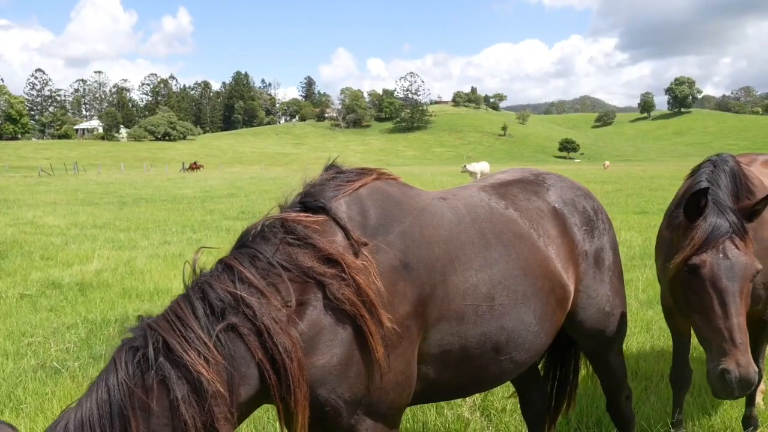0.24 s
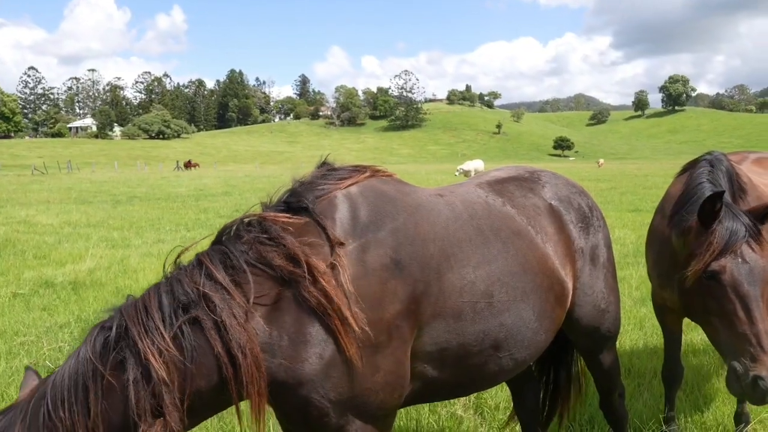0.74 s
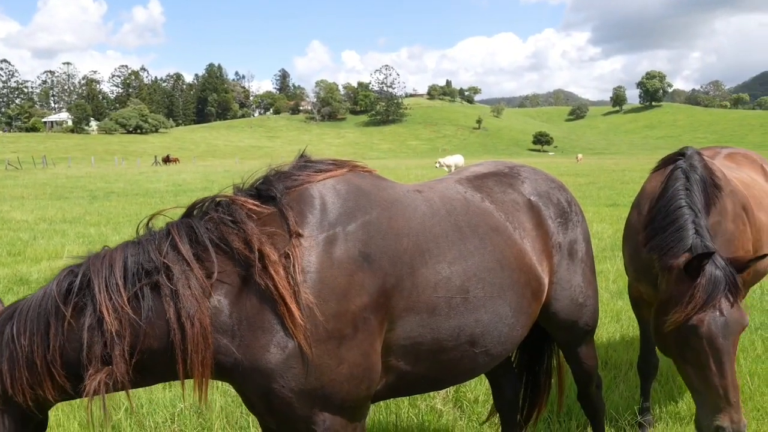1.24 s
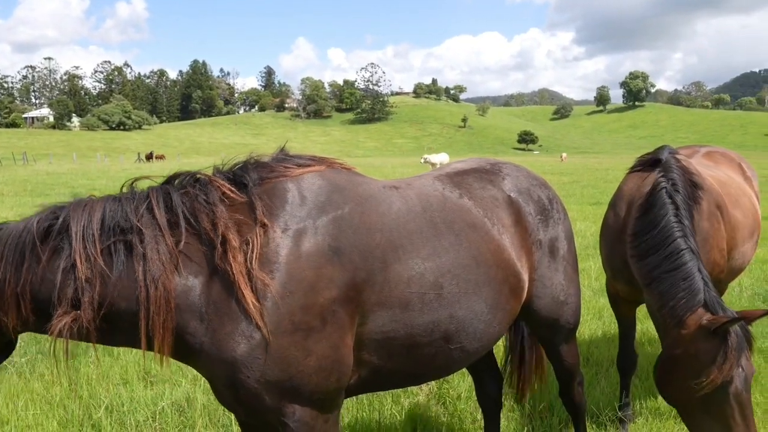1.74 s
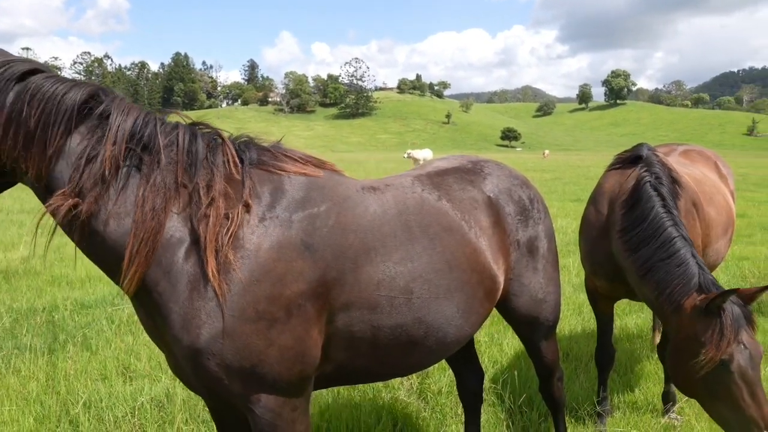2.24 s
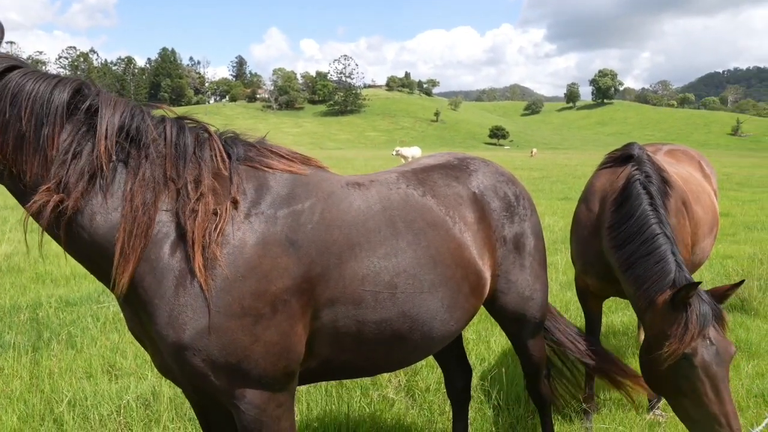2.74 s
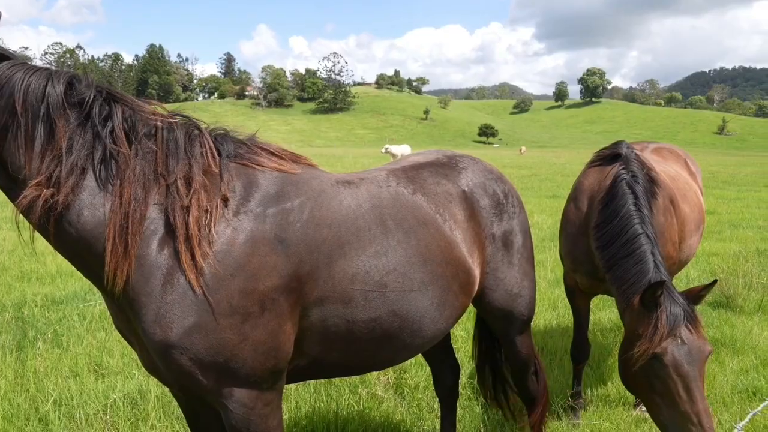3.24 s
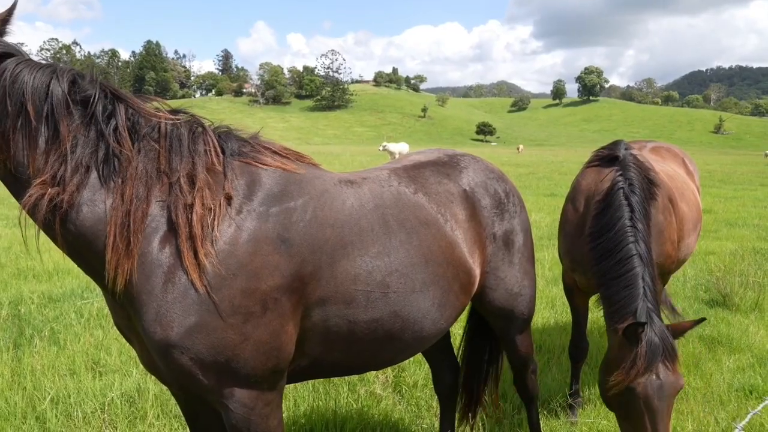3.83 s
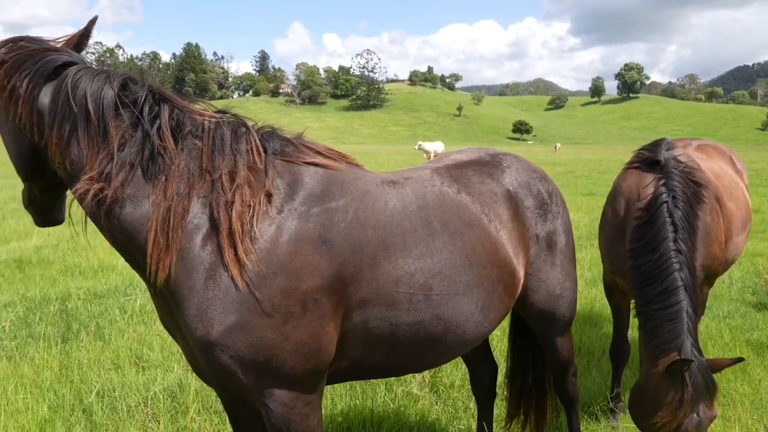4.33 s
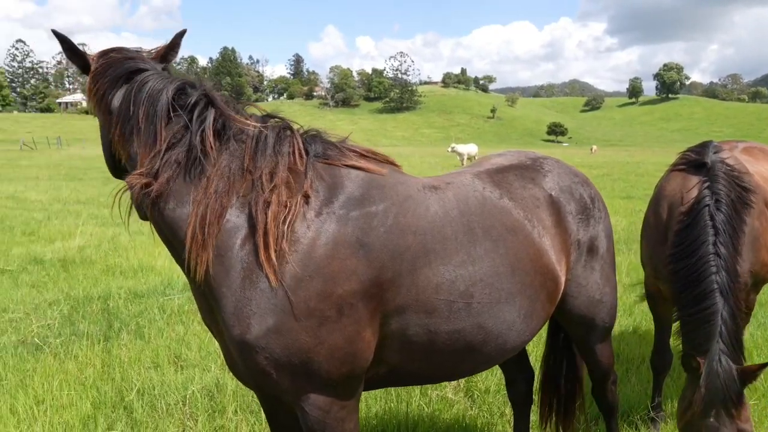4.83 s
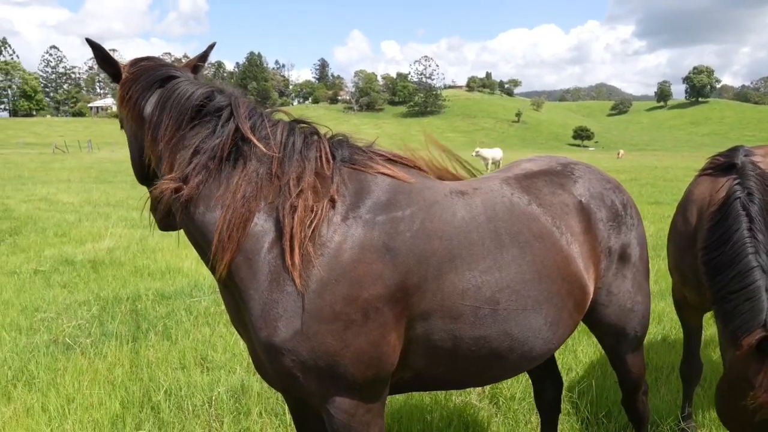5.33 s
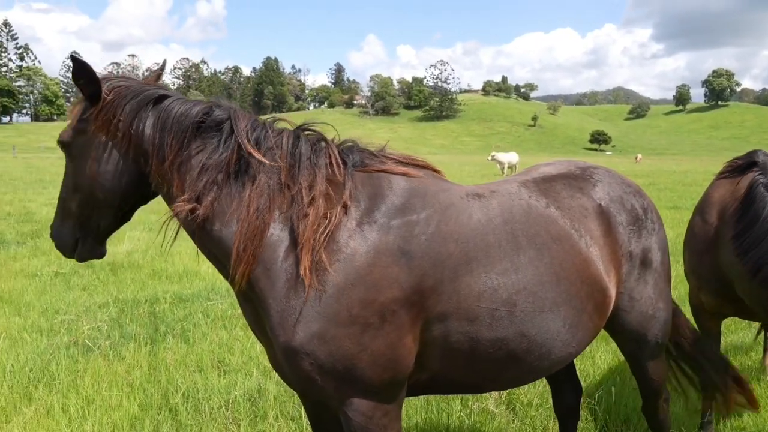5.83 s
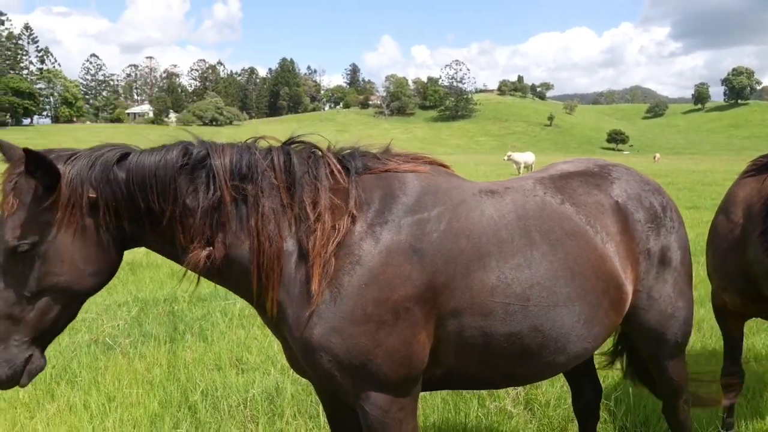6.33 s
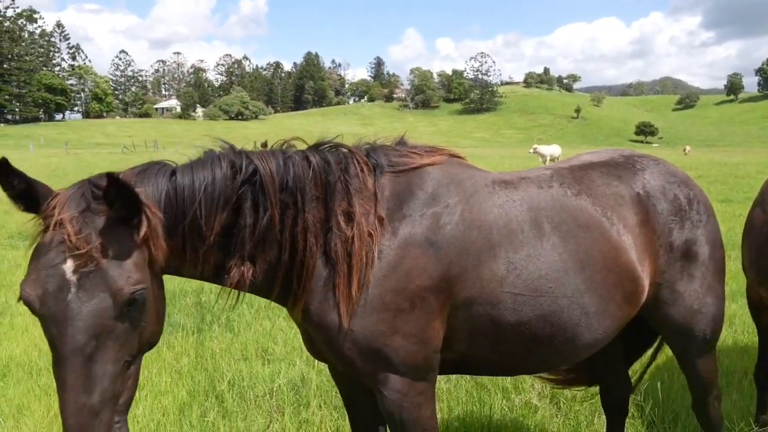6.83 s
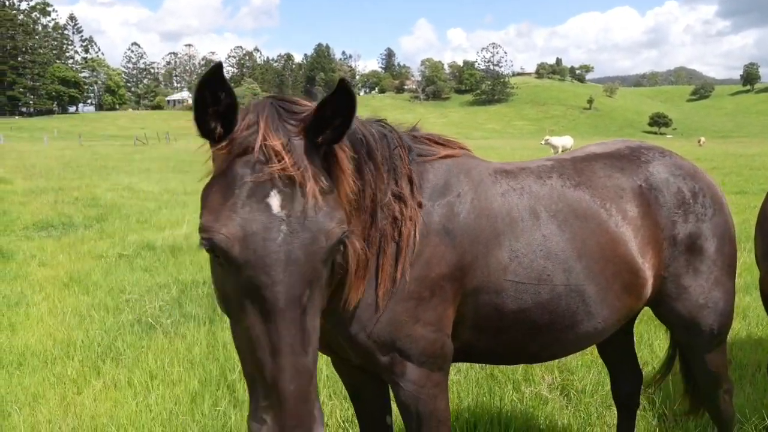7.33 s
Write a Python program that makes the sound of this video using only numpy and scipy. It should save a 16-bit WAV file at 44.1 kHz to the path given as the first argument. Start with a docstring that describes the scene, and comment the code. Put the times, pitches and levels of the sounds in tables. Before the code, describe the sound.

A horse in an open pasture gives five almost identical whinnies, starting near 0, 1.5, 3.0, 4.5 and 6.0 seconds, each lasting about 1.2 seconds. Each opens with a thin, high squeal; a lower, raspy voice joins and quavers about eight times a second, then cracks downward and fades in a hoarse, breathy flutter. The calls are central, with only a slight dull outdoor scatter. Beneath them are soft grass rustle, swelling around 1.8, and a very faint high insect trill. Wind is slight at first, then rumbles and thumps on the microphone from about 2.1, heaviest around 3.8-4.6, with smaller gusts later. Faint bright swishes pass near 1.5, 2.3, 5.2 and 5.7. Tiny metallic tinks chatter on the right around 1.4-1.7, 2.1-2.3 and 5.5-5.7. A soft woody knock at 7.5 precedes a very short, hard scrape at the end.

```python
"""Breezy pasture: one horse whinny sounds five times. It opens as a thin squeal; a second, lower voice
joins, quavers about eight times a second and sinks into a hoarse flutter. Two oscillators, torn overtones
and resonant noise make the call; each quaver is a push of the belly that bends pitch and swells the voice.
Shaped noise makes grass rustle, a faint insect trill, gusts on the microphone and light swishes;
decaying modes tinkle on the right, and filtered noise makes one soft knock and a last short scrape."""
import sys
import numpy as np
from scipy import signal
from scipy.fft import rfft, irfft, next_fast_len
from scipy.io import wavfile

SR = 44100
rng = np.random.default_rng(int(sys.argv[2]) if len(sys.argv) > 2 else 0)


def bounce(signal):
    """Save signal as a 16-bit WAV file at the path given by the first command-line argument."""
    frames = np.transpose(np.atleast_2d(signal))
    limited = np.clip(frames, -1, 1)
    pcm = np.round(limited * 32767).astype(np.int16)
    wavfile.write(sys.argv[1], SR, pcm)


N = 334219
T = np.arange(N) / SR
BREAK_S = .775  # the voice breaks, counted from the start of a whinny


def undb(db):
    """Decibels to gain."""
    return 10 ** (np.asarray(db) / 20)


def unit(x):
    """Scale to rms 1."""
    return x / np.sqrt(np.mean(x ** 2))


def curves(rows, t):
    """Each column of a table, joined by straight lines over its first column, time."""
    s, *columns = np.transpose(rows)
    return [np.interp(t, s, c) for c in columns]


def gain_at(points, hz):
    """Gain of a (Hz, dB) spectrum at any frequency, interpolated over log frequency."""
    f, db = np.transpose(points)
    return undb(np.interp(np.log(hz + 1), np.log(f), db))


def colour(x, gain):
    """Filter by gain(Hz) and scale to rms 1."""
    size = next_fast_len(len(x), True)
    spectrum = rfft(x, size) * gain(np.fft.rfftfreq(size, 1 / SR))
    return unit(irfft(spectrum, size)[:len(x)])


def noise(gain, count):
    """Noise of rms 1 whose spectrum follows gain(Hz)."""
    return colour(rng.standard_normal(count), gain)


def wobble(hz, count):
    """Random unsteadiness of rms 1, up to about hz times a second."""
    return noise(lambda f: 1 / (1 + (f / hz) ** 4), count)


def resonances(modes, hz):
    """Gain of a set of steep-sided resonances (Hz, width Hz, dB), summed in power."""
    return np.sqrt(sum(undb(db) ** 2 / (1 + (2 * (hz - f) / width) ** 6) for f, width, db in modes))


def dip(hz, centre_hz, half_width_hz, db):
    """Gain of an antiresonance; half its dB depth remains at the half width."""
    return undb(db / (1 + ((hz - centre_hz) / half_width_hz) ** 4))


def field():
    """Soft rustle of grass and far trees, wider in the treble, with a thin narrowband trill of insects."""
    # rustle spectrum: (frequency [Hz], relative level [dB])
    rustle_colour = [(180, -16), (300, -19.5), (359, -14.5), (498, -16.5), (587, -20.5), (991, -20.5),
                     (1350, -21.5), (1470, -21), (2280, -25.5), (2780, -33.5), (2920, -29), (11500, -41),
                     (15000, -52.5)]
    level_db, swell_db, swell_s, swell_length_s = -59, 4, 1.81, .73
    mid = noise(lambda f: gain_at(rustle_colour, f), N)
    side = noise(lambda f: gain_at(rustle_colour, f) * f / (f + 5000), N)
    sway_db = 1.2 * wobble(4, N)
    swell = swell_db * np.exp(-((T - swell_s) / swell_length_s) ** 2)
    rustle = undb(level_db + swell + sway_db) * (mid + undb(-4.5) * side * np.array([[1], [-1]]))

    insect_hz, insect_width_hz, insect_db = 8900, 320, -87
    insect_swell_db, insect_peak_s, insect_length_s = 8.5, 3, 2.8
    trill_db = insect_db + insect_swell_db * np.exp(-((T - insect_peak_s) / insect_length_s) ** 2)
    flicker_db = 4 * wobble(12, N)
    trill = noise(lambda f: resonances([(insect_hz, insect_width_hz, 0)], f), N)
    return rustle + undb(trill_db + flicker_db) * trill


def gusts():
    """Strength of the wind: each gust rises fast, holds and dies back into the breeze."""
    # gusts on the microphone: (hold start [s], hold [s], level [dB])
    gust_rows = [(.6, 0.027, -52), (2.122, 0.31, -45.5), (2.241, 0.033, -35), (2.518, 0.057, -32),
                 (2.62, 0.41, -41.5), (3.001, 0.5, -41), (3.782, 0.2, -33.5), (3.939, 0.24, -32),
                 (4.308, 0.12, -29.5), (4.57, 0.041, -37.5), (4.679, 0.13, -37), (5.094, 0.1, -44.5),
                 (5.271, 0.058, -31.5), (5.38, 0.35, -43.5), (5.89, 0.38, -38.5), (6.382, 0.31, -41.5),
                 (7.155, 0.026, -48), (7.526, 0.095, -42.5)]
    # breeze between gusts: (time [s], level [dB])
    breeze = [(0, -71.5), (1.7, -58.5), (4.2, -41.5), (5.8, -67), (7.5, -53.5)]
    attack_s, release_s = .022, .053
    strength = undb(curves(breeze, T)[0])
    for s, hold, db in gust_rows:
        away = np.maximum(s - T, 0) / attack_s + np.maximum(T - s - hold, 0) / release_s
        strength = np.maximum(strength, undb(db) * np.exp(-np.minimum(away, 20)))
    return strength


def wind():
    """Eddies rumble on the microphone; single buffets each swing the pressure once both ways."""
    # rumble spectrum: (frequency [Hz], relative level [dB])
    wind_colour = [(12, -80), (20, -4), (65, 5), (117, 5), (286, -10.5), (357, -21), (484, -26), (585, -28),
                   (743, -57), (900, -29), (1170, -85), (1980, -120)]
    # buffets: (time, 2 ms ahead of the centre [s], strength before the swing shape [dB],
    # centre to extreme [s])
    buffets = [(2.254, -26, 0.0015), (2.54, -16.5, 0.002), (2.809, -30, 0.0016), (2.873, -27, 0.0019),
               (2.998, -22, 0.0014), (3.026, -19.5, 0.0013), (3.069, -24.5, 0.0024), (3.173, -22, 0.0012),
               (3.352, -21.5, 0.0012), (3.85, -18, 0.0014), (3.941, -24, 0.0017), (3.965, -17, 0.0017),
               (4.032, -18, 0.0011), (4.057, -9.5, 0.0011), (4.163, -24, 0.001), (4.213, -20, .0011),
               (4.31, -27, 0.00076), (4.349, -16.5, 0.00092), (4.372, -18, 0.0021), (4.391, -19, 0.0021),
               (4.415, -21.5, 0.00084), (4.431, -27.5, 0.0006), (4.522, -26, 0.0016),
               (4.581, -16.5, 0.0014), (4.715, -29, 0.00073), (5.282, -23, 0.0016)]
    mid = noise(lambda f: gain_at(wind_colour, f), N)
    # small eddies hit each port on its own, large ones hit both
    side = noise(lambda f: gain_at(wind_colour, f) * f / (f + 300), N)
    strength = gusts() * unit(undb(2.2 * wobble(35, N)))
    out = strength * (mid + undb(-8.5) * side * np.array([[1], [-1]]))
    for s, db, half_s in buffets:
        u = (T - s - .002) / half_s
        near = np.abs(u) < 10
        out[:, near] += undb(db) * u[near] * np.exp(-u[near] ** 2 / 2)
    return signal.sosfilt(signal.butter(2, 46 / (SR / 2), "high", output="sos"), out)


def swishes():
    """Fine strands brush past each other: a bright, grainy hiss that swells and fades."""
    # swishes, likely a tail or long grass: (centre [s], half length [s], level [dB])
    strokes = [(1.497, 0.22, -78), (2.3, 0.17, -60), (5.197, 0.087, -69), (5.732, 0.055, -58.5)]
    # hiss spectrum: (frequency [Hz], relative level [dB])
    hiss_colour = [(2000, -23), (5000, 0), (9000, -8), (14000, 0), (16000, -14)]
    swell = sum(undb(db) * np.exp(-np.minimum(((T - s) / half) ** 2, 30)) for s, half, db in strokes)
    grain = unit(undb(2 * wobble(120, N)))
    hiss = np.array([noise(lambda f: gain_at(hiss_colour, f), N) for _ in range(2)])
    return swell * grain * hiss


def tinks():
    """A tiny piece of metal ticks and chatters in three high decaying modes, on the right."""
    # tinks, before envelope and panning: (start [s], low mode [dB], middle mode [dB], high mode [dB])
    tink_rows = [(1.379, -78, -64, -79), (1.4915, -76, -59, -66), (1.653, -62, -56, -71),
                 (2.136, -58, -50, -46), (2.255, -76, -63, -57), (2.296, -72, -54, -54),
                 (5.477, -72, -57, -52), (5.5654, -76, -58, -62), (5.66, -56, -51, -44)]
    mode_hz = (9650, 11680, 13450)
    tick_db, tick_t60_s = -18, .05  # contact noise, against the strongest mode
    attack_s, ring_t60_s = .004, .13
    out, t = np.zeros(N), T[:8000]
    count = len(t)
    ring = (1 - np.exp(-t / attack_s)) * undb(-60 * t / ring_t60_s)
    for s, *mode_db in tink_rows:
        modes = 0
        for hz, db in zip(mode_hz, mode_db):
            tone = np.sin(2 * np.pi * hz * t + .3 * wobble(120, count))
            modes = modes + undb(db) * tone * (1 + .35 * wobble(140, count))
        tick_fade = undb(max(mode_db) + tick_db - 60 * t / tick_t60_s)
        tick = tick_fade * noise(lambda f: resonances([(11994, 7500, 0)], f), count)
        i = int(s * SR)
        out[i:i + count] += ring * modes + tick
    return out * undb([[-5], [4]])  # left, right


def knock():
    """One dull, woody tap: decaying noise in two broad resonances."""
    start_s, level_db, attack_s, t60_s = 7.485, -44, .001, .09
    age = np.maximum(T - start_s, 0)
    fade = (1 - np.exp(-age / attack_s)) * undb(-60 * age / t60_s)
    body = noise(lambda f: resonances([(700, 1800, 5), (1800, 1300, -4)], f), N)
    return undb(level_db) * fade * body


def scrape():
    """Something hard catches and slips close by: two short jerks of resonant noise."""
    # jerks: (centre [s], half length [s], level [dB])
    jerks = [(7.5722, .0022, -29), (7.5777, .0015, -23)]
    # resonances: (frequency [Hz], width [Hz], relative level [dB])
    modes = [(705, 1150, -7), (2500, 400, -10), (4250, 360, -1), (4200, 3200, -12.5), (10000, 9300, -23)]
    swell = sum(undb(db) * np.exp(-np.minimum(((T - s) / half) ** 2, 30)) for s, half, db in jerks)
    return swell * noise(lambda f: resonances(modes, f), N)


def pushes(t):
    """Each push of the belly is a smooth hump that bends the low voice and swells chest tone and throat."""
    # one push per quaver: (peak [s], rise [s], fall [s], low voice bend [Hz], chest tone [dB], throat [dB])
    push_rows = [(.24, 0.042, .06, -150, -65, -42.5), (0.366, 0.026, .06, -115, -45, -43),
                 (.484, .04, .044, -118, -32, -34), (.603, 0.046, .042, -115, -29.5, -31.5),
                 (.728, 0.07, .042, -135, -28.5, -34.5), (.838, .055, .062, 122.5, -30, -32),
                 (.948, 0.046, .085, 180, -35, -40.5), (1.085, 0.048, .045, 91.5, -36, -61)]
    swell_shape = .44  # above 1: more pointed
    bend_shape = .8  # below 1: rounder
    push, bend, chest, throat = np.zeros((4, len(t)))
    for s, rise, fall, bend_hz, chest_db, throat_db in push_rows:
        phase = np.clip((t - s) / np.where(t < s, rise, fall), -1, 1)
        hump = np.maximum(np.cos(np.pi / 2 * phase), 0)
        swell = hump ** (2 * swell_shape)
        push += hump ** 2
        bend += bend_hz * hump ** (2 * bend_shape)
        chest += undb(chest_db) * swell
        throat += undb(throat_db) * swell
    return push, bend, chest, throat


def groan(t, hz, phase, puffs):
    """Slack folds: four harmonics slide through low resonances and grow dull, with a little puffing air."""
    # low resonances: (frequency [Hz], level [dB])
    groan_colour = [(120, -4), (180, 3.5), (230, -3.5), (310, -4.5), (390, 0), (480, 2.5), (530, -0.5),
                    (600, -12.5), (720, -27), (1000, -44)]
    # overtones fade as the breath runs out: (time [s], level per harmonic above the first [dB])
    dulling = [(1.11, 0), (1.17, -6)]
    count, dull_db = len(t), curves(dulling, t)[0]
    tone = 0
    for k in np.arange(1, 5):
        weight = gain_at(groan_colour, k * hz) / k ** .4
        level_db = (k - 1) * dull_db + 1.5 * wobble(70, count)
        tone = tone + weight * np.sin(k * phase + k * k) * undb(level_db)
    return tone + undb(-14) * puffs * noise(lambda f: gain_at(groan_colour, f), count)


def low_voice(t, hz, phase, puffs, air_db):
    """The chest tone, and its overtones mixed with air in the throat."""
    # throat and nose: (frequency [Hz], relative level [dB])
    throat_colour = [(550, -11), (700, 2), (790, -7), (940, 0), (1130, -4.5), (1350, 9), (1560, -6),
                     (1750, 4.5), (2000, -6.5), (2250, -4), (2500, -22.5), (3400, -51)]
    # overtones tear loose from the chest tone: (time [s], phase spread per harmonic number [rad])
    tearing = [(.3, .12), (.45, .14), (.76, .15), (.8, .09), (1.0, .09), (1.04, .2)]
    tear_hz, shimmer_db = 110, 3.6
    count = len(t)
    tear = curves(tearing, t)[0]
    overtones, power = 0, 0
    for k in np.arange(2, 13):
        weight = gain_at(throat_colour, k * hz)  # the overtone slides through the throat's resonances
        torn_phase = k * (phase + tear * wobble(tear_hz, count)) + k * k
        overtones = overtones + weight * np.sin(torn_phase) * undb(shimmer_db * wobble(56, count))
        power = power + weight ** 2
    overtones = unit(overtones / np.sqrt(power))
    air = puffs * noise(lambda f: gain_at(throat_colour, f), count)
    voice = (overtones + undb(air_db) * air) / np.sqrt(1 + undb(2 * air_db))
    # at the end the folds slacken: the tone turns into a groan
    slack = np.clip((t - 1.015) / .0097, 0, 1)
    tone = np.sqrt(2) * np.sin(phase) * undb(1.64 * wobble(81, count))
    return (1 - slack) * tone + slack * groan(t, hz, phase, puffs), voice


def linger(x):
    """Quick, dense reflections let each torn overtone ring on for a moment."""
    count, ring_db, t60_s = 4000, 0, .07
    tail = rng.standard_normal(count) * undb(-60 * T[:count] / t60_s)
    ringing = signal.fftconvolve(x, tail / np.linalg.norm(tail))[:len(x)]
    return unit(x + undb(ring_db) * ringing)


def rasp(t, high, low, puffs):
    """Torn overtones of both voices and rushing air ring the mouth, which takes three shapes in turn."""
    # mouth: (frequency [Hz], width [Hz], then relative level [dB] in squeal, quaver and after the break)
    mouth_modes = np.array([(2926, 424, 4, 4.5, 5), (3417, 330, 2.5, 3, 4.5), (3944, 400, -6, 2.5, 0.5),
                            (4250, 530, -1, -3, -11), (4680, 120, 2, -18, -8), (4934, 200, -1, -4, -2),
                            (5402, 730, -11.5, 1, -9), (6340, 1140, -12.5, -10.5, -7.5),
                            (6460, 340, -7, -19, -20), (7460, 740, -17.5, -12, -18.5),
                            (8480, 1070, -19, -16.5, -14), (9360, 580, -16, -18, -36),
                            (10050, 770, -19, -12.5, -8)])
    # the squeal's torn overtones: (time [s], level [dB])
    torn_level = [(.25, -4.5), (.5, -8.5), (.68, 0), (.8, -3)]
    # mouth antiresonances until the break: (frequency [Hz], half width [Hz], depth [dB])
    mouth_dips = [(2650, 180, -1), (4880, 86, -14), (5770, 190, -8)]
    buzz_db, rush_db = -1, -4
    glance_s, glance_gain = .0031, .17  # a close reflection ripples the treble
    quaver_s = .489  # the mouth takes its second shape
    count = len(t)
    torn = sum(np.sin(k * high) * undb(3 * wobble(150, count)) for k in (2, 3, 4))
    torn = unit(torn * (1 + .14 * np.cos(low) + .12 * np.cos(2 * low)))
    buzz = unit(sum(np.sin(k * low + k * k) * undb(4 * wobble(60, count)) for k in np.arange(5, 21)))
    rush = puffs * rng.standard_normal(count)
    source = undb(curves(torn_level, t)[0]) * torn + undb(buzz_db) * buzz + undb(rush_db) * rush
    source = linger(source + glance_gain * np.roll(source, int(glance_s * SR)))

    def shaped(column):
        return colour(source, lambda f: resonances(mouth_modes[:, [0, 1, column]], f))

    def hollows(f):
        return np.prod([dip(f, *row) for row in mouth_dips], axis=0)

    squealing = colour(shaped(2), lambda f: hollows(f) * dip(f, 2970, 100, -16))
    quavering = colour(shaped(3), hollows)
    broken = shaped(4)
    opened = np.clip((t - quaver_s) / .03, 0, 1)
    past = np.clip((t - BREAK_S) / .0072, 0, 1)
    return (1 - opened) * squealing + (opened - past) * quavering + past * broken


def rings(t, push):
    """Narrow resonances of the open mouth as noise bands; each push pulls them down, they drift and flare."""
    # open mouth: (frequency [Hz], half width [Hz], relative level [dB])
    ring_rows = [(3294, 52, -7), (3850, 150, -7.5), (4364, 66, -9), (4570, 64, -11.5), (5234, 115, -10.5),
                 (5500, 45, -17.5), (6390, 44, -13.5), (6780, 120, -12), (9420, 150, -20)]
    sag, wander = .025, .007  # shares of the frequency
    count, out = len(t), 0
    for hz, half_width_hz, db in ring_rows:
        turn = 2 * np.pi * hz * np.cumsum(1 - sag * push + wander * wobble(14, count)) / SR
        flare = unit(undb(2.5 * wobble(16, count)))
        band = wobble(half_width_hz, count) * np.sin(turn) + wobble(half_width_hz, count) * np.cos(turn)
        out = out + undb(db) * flare * band
    return out * np.interp(t, [.22, .5, .75, .8], [.59, .65, .69, .65])


def squeal_voice(t, high, low):
    """The high oscillator: a whistle, sidebands spaced by the low voice, and ragged overtones."""
    # overtones: (time [s], second harmonic against the squeal [dB], third against the squeal [dB])
    overtone_levels = [(.11, -24, -34), (.15, -15, -28), (.185, -22, -24), (.235, -15, -20),
                       (.265, -13, -5), (.305, -13, -24), (.39, -14, -12), (.45, -13, -18), (.8, -26, -26)]
    sideband_flicker_db, overtone_flicker_db, overtone_tear_rad = 3.5, 4, 1.1
    count = len(t)
    # the low voice hangs sidebands under the squeal until the voice breaks
    coupling = np.interp(t, [.3, .37, BREAK_S, .8], [0, 1, 1, 0])
    sidebands = 0
    for k, db in enumerate([-2, -7], 1):
        flicker = undb(sideband_flicker_db * wobble(42, count))
        sidebands = sidebands + undb(db) * np.sin(high - k * low) * flicker
    whistle = unit(np.sin(high) * undb(2.8 * wobble(170, count)))
    overtones = 0
    for k, db in enumerate(curves(overtone_levels, t), 2):
        ragged = np.sin(k * high + overtone_tear_rad * wobble(190, count))
        flicker = unit(undb(overtone_flicker_db * wobble(70, count)))
        overtones = overtones + undb(db) * ragged * flicker
    return whistle + coupling * sidebands + overtones


def whinny():
    """Two oscillators in one larynx: the low one modulates the rasp and the rush of air once a cycle."""
    # all times count from the start of the whinny
    # steady pressure under the pushes: (time [s], chest tone [dB], throat [dB])
    pressure = [(.19, -86, -58), (.32, -82, -37.5), (.43, -63, -40.5), (.54, -40.5, -37), (.65, -41, -35.5),
                (.76, -47, -31.5), (.79, -42.5, -42.5), (.91, -38.5, -39.5), (1.0, -33, -29.5),
                (1.04, -33.5, -42), (1.09, -36.5, -45), (1.12, -35, -41.5), (1.19, -48.5, -57),
                (1.3, -59, -97)]
    # rasp between pushes: (time [s], level [dB])
    rasp_level = [(.19, -73), (.25, -52), (.5, -45), (.64, -43), (.76, -45.5), (.79, -50.5), (.87, -45.5),
                  (.92, -51), (1.01, -45.5), (1.06, -53.5), (1.12, -56.5), (1.25, -73)]
    # squeal between pushes: (time [s], level [dB])
    squeal_level = [(.08, -66), (.113, -62), (.12, -47), (.165, -44), (.2, -51), (.4, -50.5), (.6, -42.5),
                    (.8, -53), (.92, -41.5), (1.08, -73)]
    # hoarseness between pushes: (time [s], pitch jitter [share], air against tone [dB])
    hoarse = [(.2, .03, -4), (.33, .026, -5), (.45, .024, -6.5), (.75, .024, -6.5), (.79, .019, -7.5),
              (1.0, .013, -9.5), (1.04, .024, -2), (1.25, .035, 2)]
    # low voice between pushes, nearly an octave down at the break: (time [s], pitch [Hz])
    low_rest = [(.19, 861), (.305, 750), (.425, 634), (.53, 562.2), (.768, 541.6), (.779, 286.9), (.9, 321),
                (.95, 294), (1.01, 327.7), (1.028, 249.7), (1.1, 214.6), (1.14, 165.7), (1.25, 148.2)]
    # squeal between pushes: (time [s], pitch [Hz])
    high_rest = [(.09, 1990), (.12, 1880), (.15, 1893), (.2, 2216), (.32, 2320), (.55, 2317), (.64, 2217),
                 (.71, 2344), (.78, 1957), (.88, 1970), (1.2, 1922)]
    # catches of the voice, mostly between pushes: (time [s], level change [dB])
    catches = [(.185, -4), (.25, -5), (.287, -1), (.41, 1), (0.534, -4), (.652, -0.5), (.787, 0),
               (0.905, 1)]
    catch_half_s = .0062
    squeal_push_db, rasp_push_db = 8.5, .5  # gained at the top of a push
    squeal_sag = .062  # share by which a full push flattens the squeal
    clearing, clearing_db = .45, -6  # a push steadies the pitch (share) and cuts the air
    jitter_hz, tremble_db, rasp_tremble_db = 235, .9, .4
    count = 60000
    t = T[:count]

    push, bend_hz, *swells = pushes(t)
    chest, throat = np.hypot(undb(curves(pressure, t)), swells)
    rough_db = curves(rasp_level, t)[0] + rasp_push_db * push + rasp_tremble_db * wobble(105, count)
    squeal = undb(curves(squeal_level, t)[0] + squeal_push_db * push)
    jitter, air_db = curves(hoarse, t)
    jitter = jitter * (1 - clearing * push)
    air_db = air_db + clearing_db * push

    low_hz = curves(low_rest, t)[0] + bend_hz
    high_hz = curves(high_rest, t)[0] * (1 - squeal_sag * push)
    low = 2 * np.pi * np.cumsum(low_hz * (1 + jitter * wobble(jitter_hz, count))) / SR
    high = 2 * np.pi * np.cumsum(high_hz * (1 + .019 * wobble(280, count))) / SR
    puffs = unit((1 + .3 * np.cos(low)) * undb(1.3 * wobble(110, count)))

    tone, voice = low_voice(t, low_hz, low, puffs, air_db)
    roughness = (rasp(t, high, low, puffs) + rings(t, push)) * (1 + .25 * np.cos(low))
    joined = np.clip((t - .195) / .025, 0, 1)  # the low voice sets in after the squeal
    call = joined * (chest * tone + throat * voice + undb(rough_db) * roughness)
    call = call + squeal * squeal_voice(t, high, low)
    # the nose swallows a narrow band
    call = irfft(rfft(call) * dip(np.fft.rfftfreq(count, 1 / SR), 705, 55, -12), count)
    catch_db = sum(db * np.exp(-((t - s) / catch_half_s) ** 2) for s, db in catches)
    fade = np.interp(t, [.06, .09, 1.2, 1.34], [0, 1, 1, 0])
    return call * undb(catch_db + tremble_db * wobble(32, count)) * fade


def whinnies():
    """The call and its short, dull scatter, five times from straight ahead."""
    # start of each whinny [s]
    starts = [0, 1.515, 2.9836, 4.4985, 6.0136]
    scatter_db, scatter_t60_s, scatter_delay_s = -19, .44, .012
    call, count = whinny(), 22000
    t = T[:count]
    tail = noise(lambda f: resonances([(1745, 1960, 0)], f), count)
    tail = tail * undb(-60 * t / scatter_t60_s) * (t > scatter_delay_s)
    scatter = signal.fftconvolve(call, tail / np.linalg.norm(tail))[:len(call)]
    call = call + undb(scatter_db) * scatter
    out = np.zeros(N + len(call))
    for s in starts:
        i = int(s * SR)
        out[i:i + len(call)] += call
    return out[:N]


def scene():
    """The horse in the middle, with the pasture around it."""
    return field() + wind() + swishes() + tinks() + knock() + scrape() + whinnies()


def record(dry):
    """The recorder cuts the top with a steep low-pass."""
    top_hz = 15450
    return signal.sosfilt(signal.ellip(10, .2, 80, top_hz, fs=SR, output="sos"), dry)


dry = scene()
out = record(dry)
bounce(out)
```